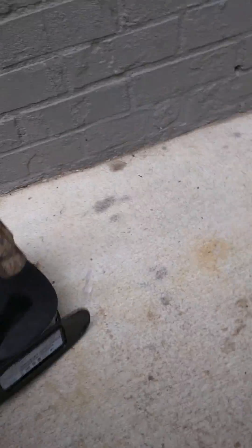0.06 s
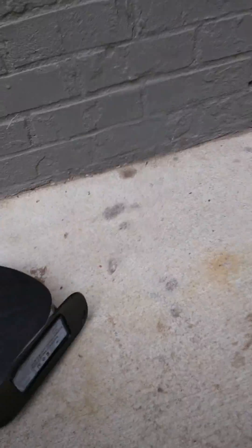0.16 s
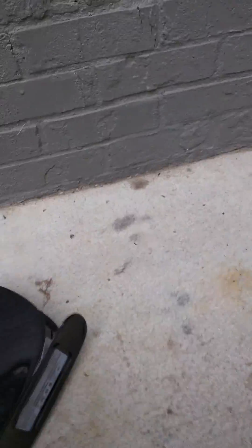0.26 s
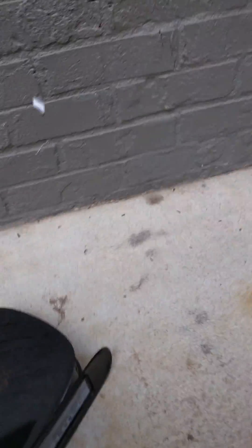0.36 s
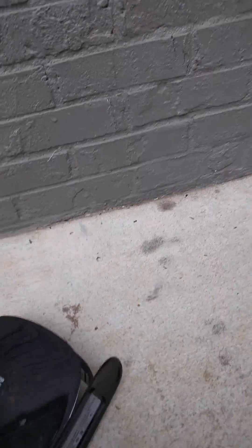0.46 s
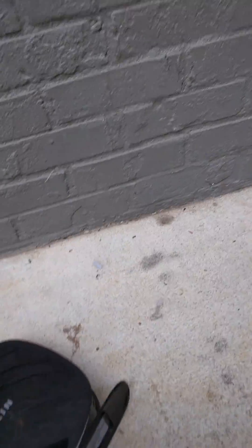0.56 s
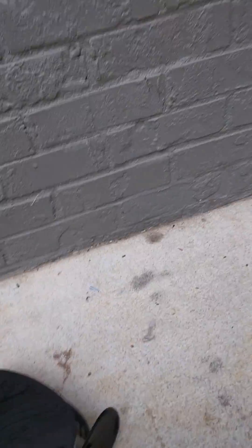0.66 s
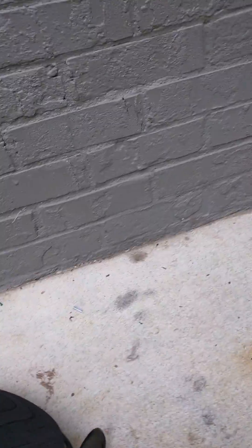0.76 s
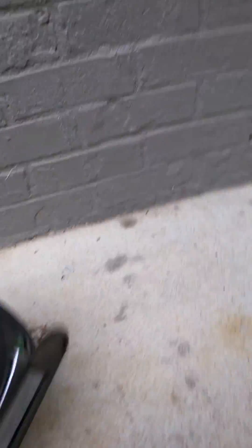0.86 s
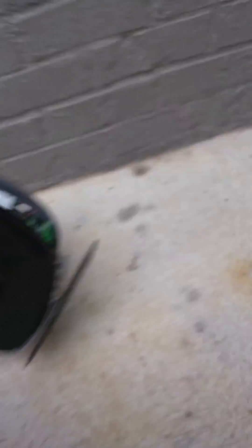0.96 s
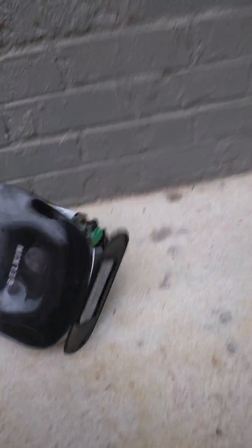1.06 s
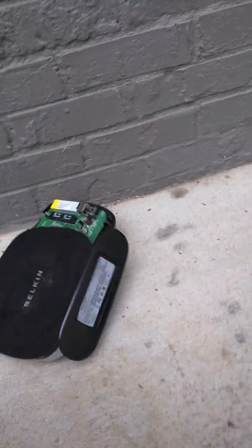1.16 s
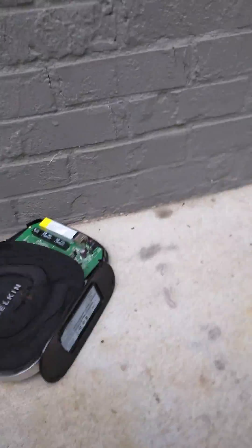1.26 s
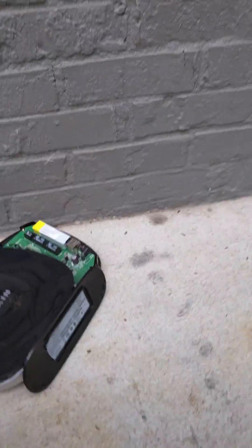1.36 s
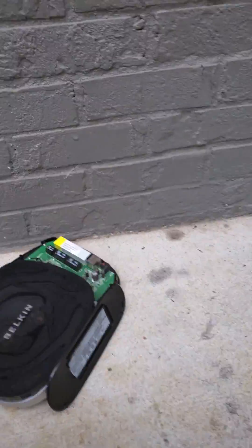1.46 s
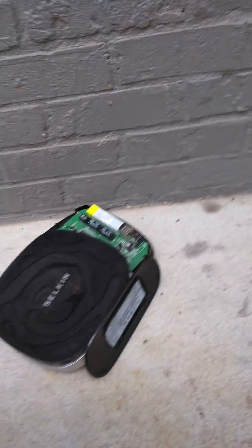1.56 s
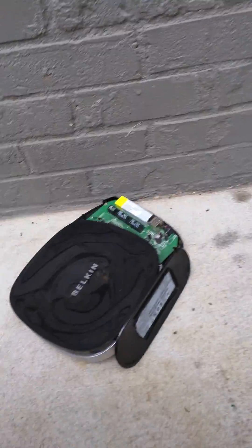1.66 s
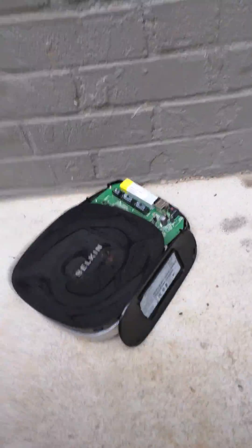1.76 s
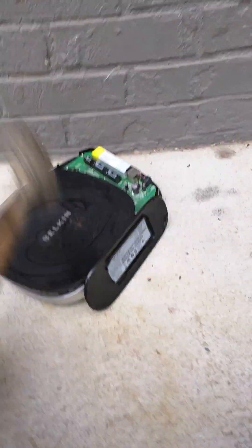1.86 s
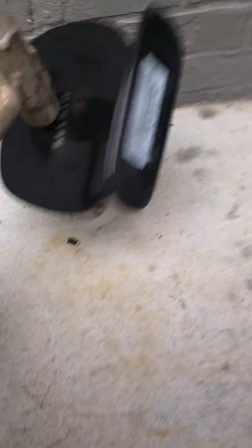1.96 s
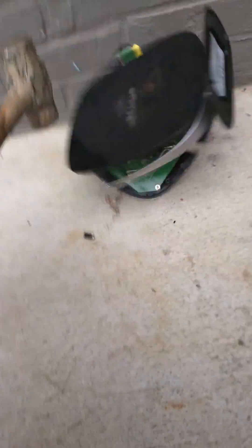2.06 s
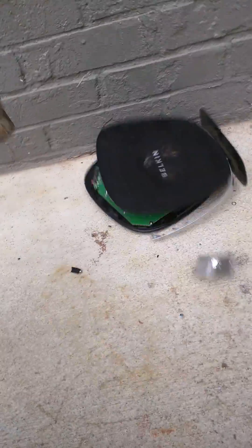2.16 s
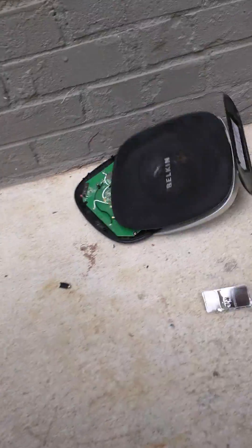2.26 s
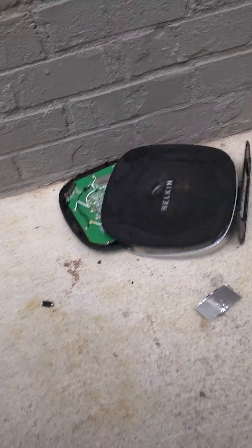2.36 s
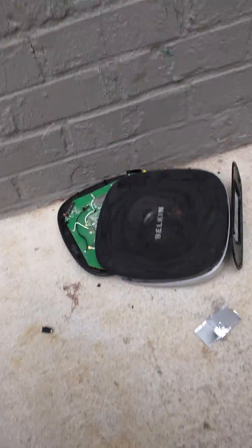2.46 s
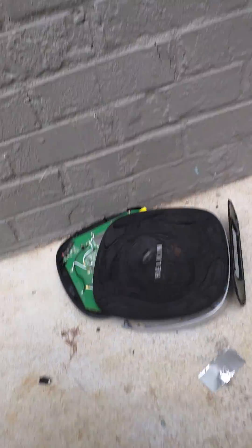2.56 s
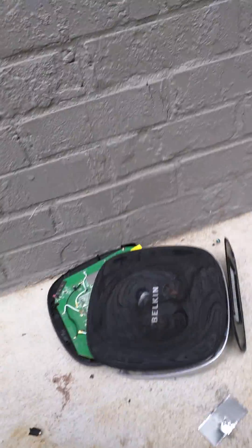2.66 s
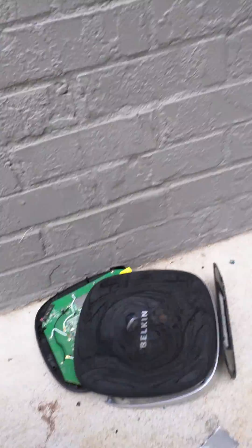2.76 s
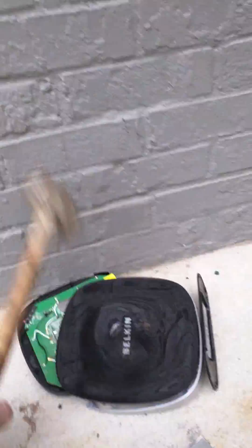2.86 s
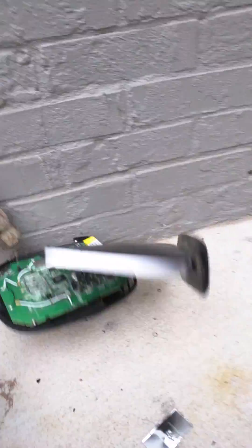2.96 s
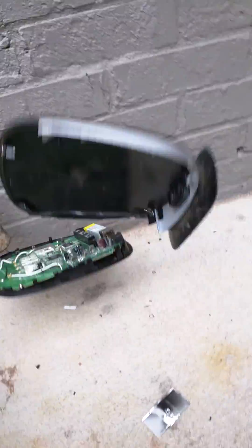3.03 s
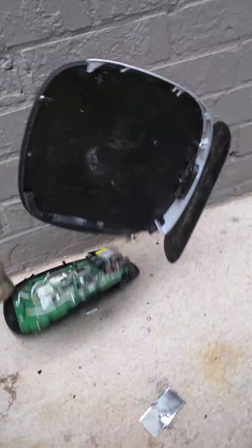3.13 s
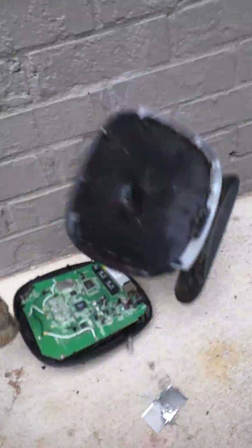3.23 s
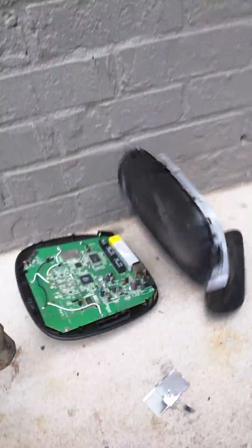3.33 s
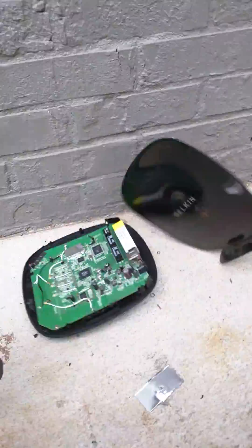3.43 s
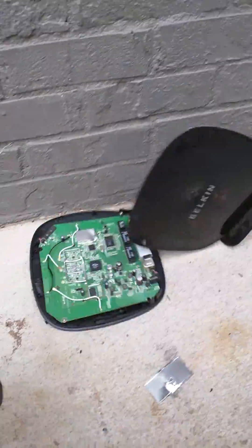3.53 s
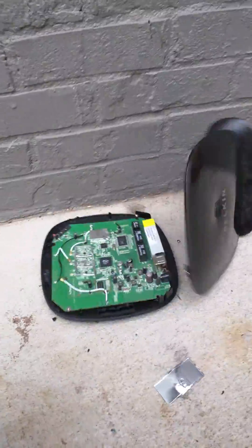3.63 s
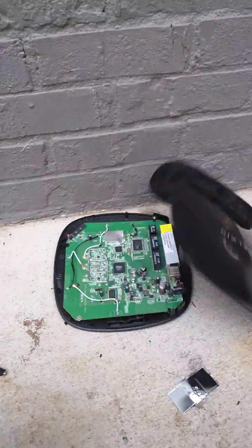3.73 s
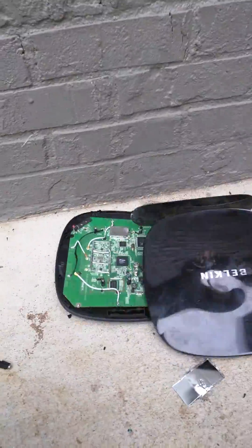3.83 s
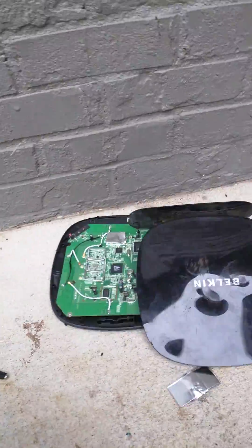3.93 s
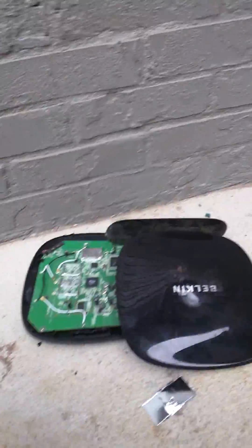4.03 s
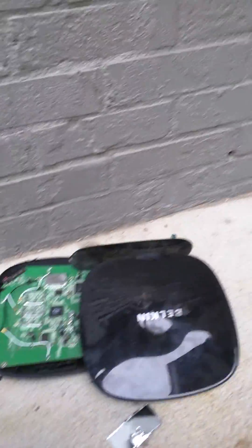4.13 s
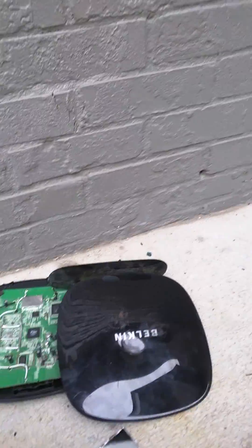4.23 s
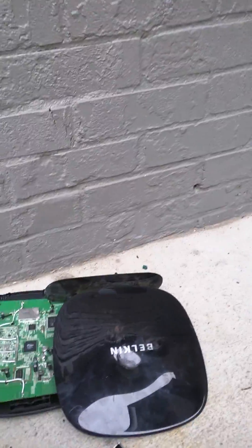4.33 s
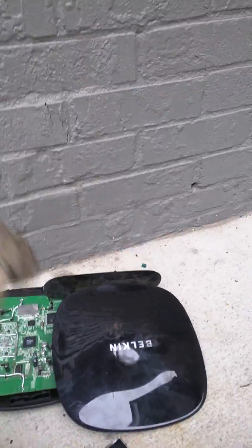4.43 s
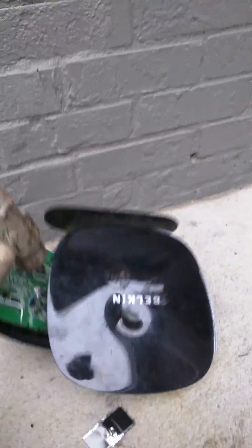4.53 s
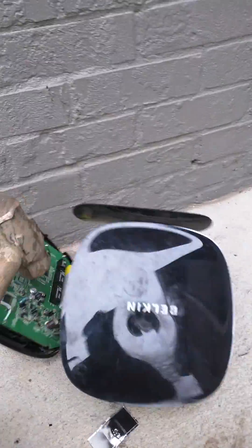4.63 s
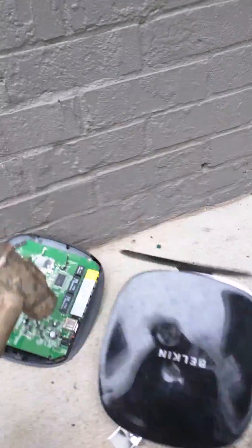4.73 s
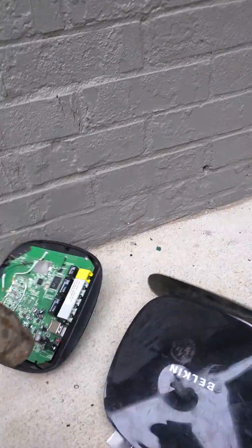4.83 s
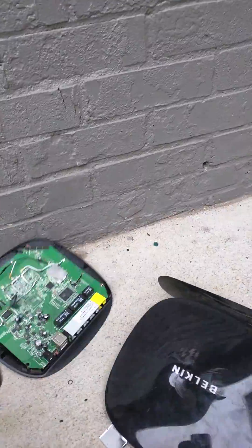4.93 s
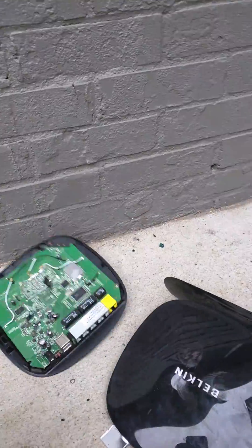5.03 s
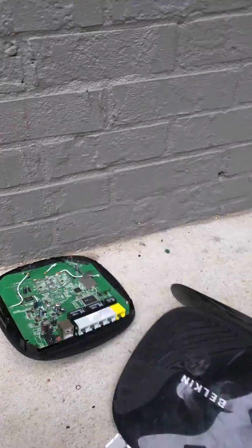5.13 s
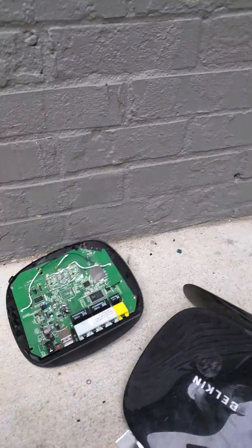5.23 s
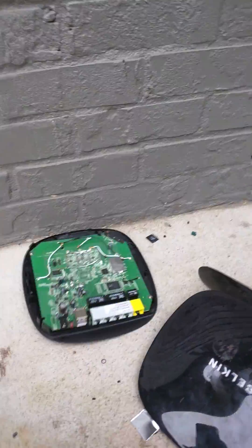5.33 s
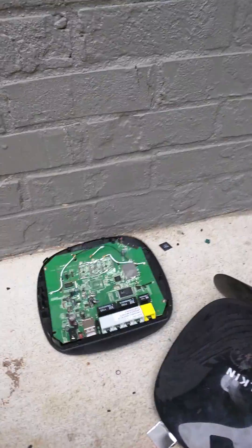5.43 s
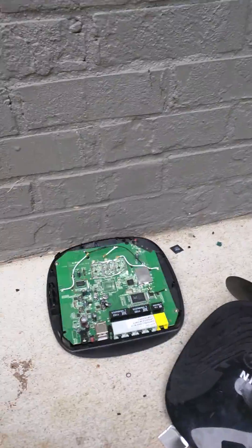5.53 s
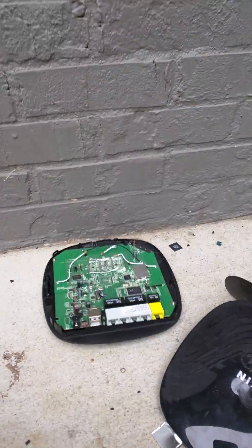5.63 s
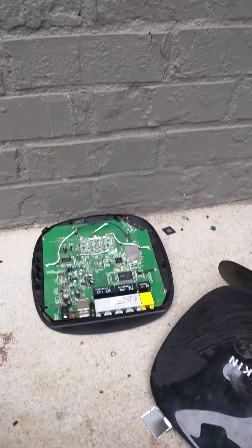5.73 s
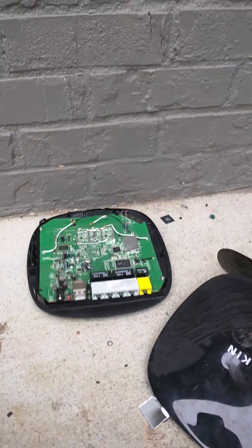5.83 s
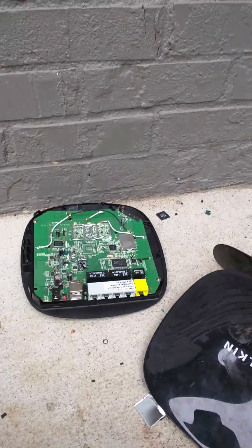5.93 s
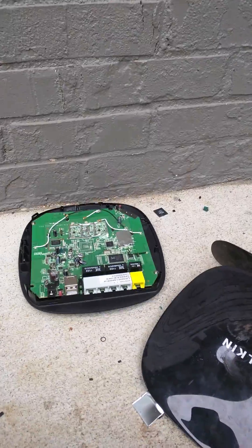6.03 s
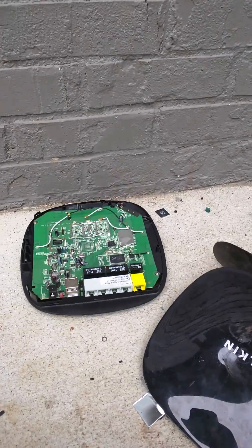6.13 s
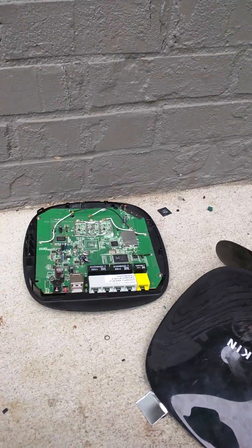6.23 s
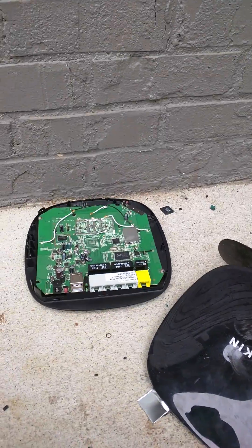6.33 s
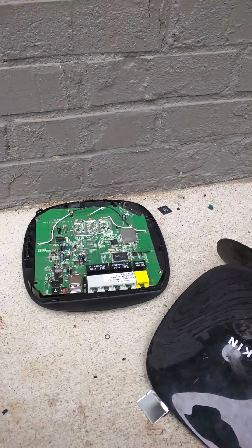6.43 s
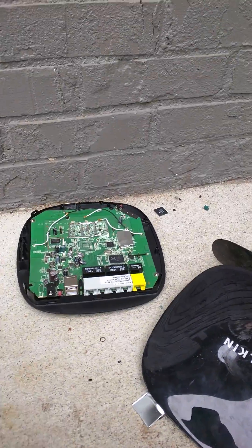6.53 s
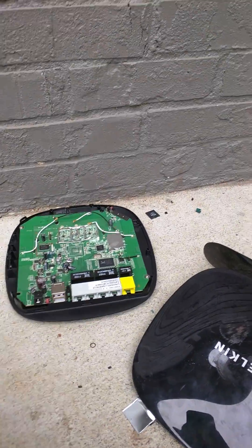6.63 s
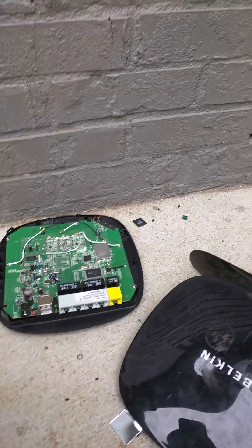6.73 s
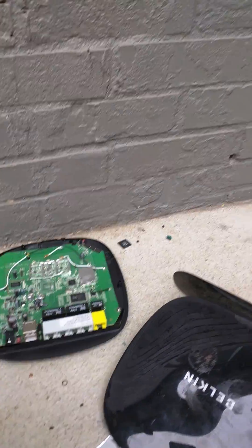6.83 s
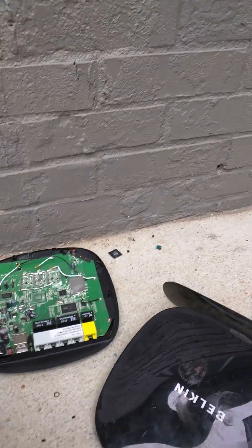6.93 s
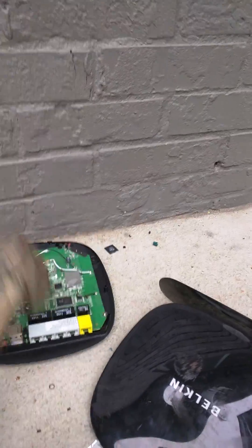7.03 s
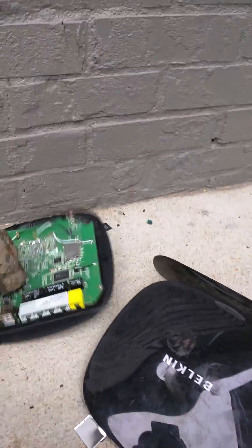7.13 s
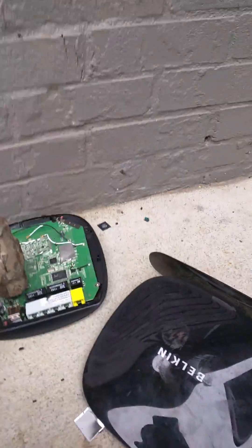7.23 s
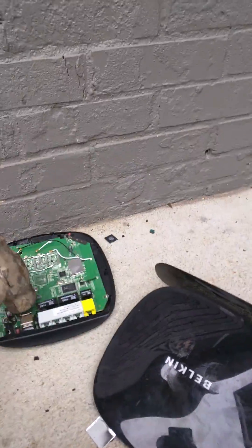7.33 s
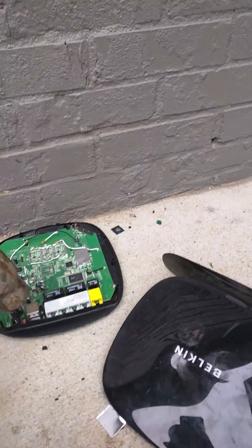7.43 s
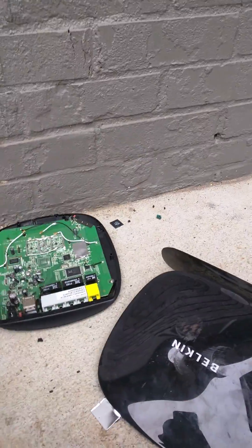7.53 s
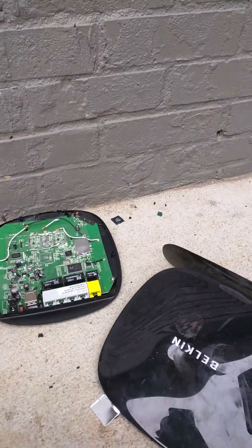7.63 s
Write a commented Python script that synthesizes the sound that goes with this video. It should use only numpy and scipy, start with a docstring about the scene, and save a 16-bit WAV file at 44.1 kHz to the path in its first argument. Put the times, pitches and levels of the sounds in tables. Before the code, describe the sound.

Close to a phone microphone outdoors, plastic pieces rattle on concrete after an earlier blow and a brief low rumble. Five hard mallet strikes follow, crunching and slightly clipped. Shell halves bounce and clack hollowly, a thin metal plate tinkles, and an open tray rocks on its rim with fading taps before a last whack. A wall and concrete give a short echo over faint hum and hiss.

```python
"""Plastic pieces still rattle from an earlier blow, over a brief low rumble; then come five mallet blows
on a plastic casing on concrete. Noise bursts make the crushing and splinters. Bursts with short tones make the
shell halves bounce and rock; uneven ticks make crumbs rattle. Fading tones make a metal plate, bracket and clip
jingle. A brick wall and the concrete echo; hum, hiss and wind lie underneath. A close phone microphone clips
the blows."""
import sys
import numpy as np
from scipy import signal
from scipy.fft import rfft, irfft, next_fast_len
from scipy.io import wavfile
from scipy.ndimage import uniform_filter1d, map_coordinates

SR = 44100
rng = np.random.default_rng(int(sys.argv[2]) if len(sys.argv) > 2 else 0)


def put_to_file(sound):
    """Save the sound as 16-bit audio at rate SR, in the file named by the first command-line argument."""
    columns = np.atleast_2d(sound).T  # one column per channel
    safe = np.clip(columns, -1, 1)
    whole_steps = np.round(safe * 32767)
    wavfile.write(sys.argv[1], SR, whole_steps.astype(np.int16))


N = 338774  # length in samples

# All levels in decibels are relative: each function sets its own balance on top of them.
# mallet blows: start_s, level_db, thump_db, crushing_s
MALLET_BLOWS = [(0.952, 0.5, -32, 0.021), (2.032, -0.5, -19, 0.017), (3.042, 1, -24, 0.014),
                (4.614, 3, -14, 0.0057), (7.192, -0.5, -16, 0.013)]
# colour of the crushing noise: pitch_hz, level_db
CRUSH_COLOUR = [(35, -11.5), (60, 3.5), (566, -1), (1200, 3), (1660, 0.5), (1860, 4.5), (2470, -2.5),
                (11800, -1), (16000, -1.5)]
# colour of plastic crunching on concrete: pitch_hz, level_db
CRUNCH_COLOUR = [(59, -54.5), (100, -23), (197, -11.5), (502, -10.5), (801, -6), (1030, -3.5), (1360, -2.5),
                 (1610, 1.5), (2420, -0.5), (14700, 2.5), (16000, -4.5)]


def blows():
    """Each blow crushes the plastic for a moment and pushes the air once; then splinters die away."""
    crush, splinters, push = np.zeros((3, N))
    t = np.arange(SR // 2) / SR
    for start_s, level_db, thump_db, crushing_s in MALLET_BLOWS:
        after = np.maximum(t - crushing_s, 0)
        rise = amp(level_db) * (1 - np.exp(-t / 0.0022))
        add(crush, start_s, rise * amp(-6.0 - 60 * after / 0.06))
        add(splinters, start_s, rise * amp(-16.5 - 60 * after / 0.45))
        air_pulse = np.exp(-((t - 0.012) / 0.0082) ** 2)
        ripple = 1 + 0.43 * np.sin(2 * np.pi * 85 * t)
        add(push, start_s, amp(thump_db) * air_pulse * ripple)
    return crush * noise(CRUSH_COLOUR) + splinters * noise(CRUNCH_COLOUR) + push


# shell pieces touching down: start_s, level_db, hollow_db (knock), treble_db (splinters),
# pitch_hz (panel), fade_s (basic time to fall by 60 dB)
SHELL_CONTACTS = [(0.087, -6, -16, -11.5, 1190, 0.39), (0.132, 5.5, -11, -13.5, 610, 0.099),
                  (0.169, -6, -15, -8, 773, 0.39), (0.354, 8.5, -15, -19, 833, 0.069),
                  (0.405, -11, -7, -16, 830, 0.059), (0.444, -5.5, -25, -2.5, 820, 0.13),
                  (0.488, -12.5, -20, 3, 1320, 0.044), (.535, -13, -23, -2, 1410, 0.054),
                  (0.558, -12, -9, -14, 1366, 0.44), (0.602, -3.5, 1, -22, 675, 0.11),
                  (0.632, -4.5, -1.5, -7.5, 775, 0.15), (0.72, -13.5, -35, -14, 1398, 0.09),
                  (0.865, -26, -6, -12.5, 515, 0.53), (1.061, -8, -9, -18, 1384, 0.14),
                  (1.161, 3.5, -5.5, -18, 1164, 0.13), (1.178, -17, -20, 6, 810, 0.039),
                  (1.239, 5, -15, -11.5, 790, 0.068), (1.262, -0.5, -17, -14, 1151, 0.25),
                  (1.306, -6, -11, -10, 1110, 0.18), (1.325, -3, -24, -4, 1360, 0.076),
                  (1.379, 5, -29, -13, 1356, 0.098), (1.454, -6, -20, -7.5, 1374, 0.31),
                  (1.498, -1, -17, -7, 1265, 0.078), (1.517, -8.5, -19, -7, 626, 0.15),
                  (1.599, -11.5, -31, -21, 1950, 0.12), (1.66, -21.5, -21, -4.5, 1624, 0.23),
                  (1.699, -21, -36, -15, 1555, 0.084), (1.784, -27, -10, -6, 1690, 0.078),
                  (1.899, -36, -20, -9, 930, .05), (1.948, -36, -25, -12, 1150, 0.065),
                  (2.169, -7.5, -4.5, -15, 604, 0.15), (2.211, -8, 4, -5.5, 780, 0.087),
                  (2.245, 2.5, -16, -18, 1223, 0.07), (2.264, -18, -31, 8.5, 2040, 0.069),
                  (2.282, 2.5, -14, -11.5, 1410, 0.15), (2.311, -3, -10.5, -8.5, 1490, 0.25),
                  (2.375, -7, -28, -28, 1484, 0.077), (2.418, -9, -6.5, 1.5, 1570, 0.042),
                  (2.432, -1.5, -35, -17, 1330, 0.11), (2.464, -16, -25, -8, 1366, 0.16),
                  (2.489, -2, -13.5, -13, 1377, 0.18), (2.538, -7.5, -10, -24, 1640, 0.094),
                  (2.616, -6, -40, -25, 1400, 0.11), (2.65, -9, -32, -13, 1415, 0.12),
                  (2.718, -16.5, -33, -24, 1480, 0.072), (2.784, -25, -30, -22, 1550, 0.067),
                  (2.823, -28, -28, -20, 1404, 0.14), (2.856, -27, -21, -20, 2100, 0.089),
                  (2.915, -27.5, -14, -24, 1320, 0.28), (3.24, -7, -17, -19, 1210, 0.034),
                  (3.261, -12, 5, -18, 850, 0.08), (3.351, 0, -9, -5, 870, 0.091),
                  (3.363, 2, -27, -11, 1603, 0.084), (3.427, -12, -26, -10, 1620, 0.37),
                  (3.443, -4, -10, -11, 620, 0.32), (3.505, 0, -7, -7.5, 1460, 0.063),
                  (3.526, -5.5, -3, -7.5, 827, 0.12), (3.579, -12.5, -9, -11, 569, 0.32),
                  (3.655, -6, -14.5, -22, 604, 0.079), (3.66, -6.5, -21, -22, 1380, 0.043),
                  (3.688, -3.5, -7.5, -15, 3060, 0.06), (3.729, -16, -30, -20, 3100, 0.027),
                  (3.759, -6.5, -15, -12, 1150, 0.07), (3.797, -1, -16, -17, 2280, 0.064),
                  (3.839, -12, -25, -22, 2250, .04), (3.864, -13.5, -20, -17, 1160, .04),
                  (3.91, -10.5, 0.5, -8, 870, 0.061), (3.919, -8, -32, -9, 535, 0.15),
                  (3.951, -8, -8, -11, 754, 0.24), (4.029, -18.5, -6, -7, 570, 0.18),
                  (4.139, -9.5, -13, -16, 810, 0.13), (4.186, -16, -18, -8, 1395, 0.089),
                  (4.254, -18, -6, -31, 874, 0.064), (4.265, -23, -23, -23, 1290, 0.085),
                  (4.297, -21.5, -20, -9, 1440, 0.091), (4.332, -21, -20, -22, 953, 0.13),
                  (4.872, 1, -11, -14, 844, 0.07), (4.881, 1.5, -7, -10.5, 805, 0.13),
                  (4.944, 5, -14.5, -14, 932, 0.11), (4.962, -5, -18, -10, 867, .07),
                  (5.045, 0, -13, -10, 1367, 0.2), (5.117, -6, -19, -37, 650, 0.089),
                  (7.288, -8, -17, -8.5, 2140, 0.28), (7.298, -1.5, -25, -16, 1766, 0.083),
                  (7.377, -5, -11, -8.5, 1590, 0.068), (7.437, -9, -14, -13, 1290, 0.077),
                  (7.487, -12, -7.5, -9, 1650, 0.23), (7.6, -32.5, -29, 10, 480, 0.036),
                  (7.629, -21, -55, 9.5, 3450, 0.042), (7.642, -18, -30, -22, 2100, 0.051)]
# the open tray rocking on its rim, tap after tap: start_s, level_db, pitch_hz (panel), fade_s
ROCKING_TAPS = [(5.21, 0, 1340, 0.093), (5.237, 1.5, 1360, 0.1), (5.326, -10, 1430, 0.17),
                (5.342, -1, 1165, 0.03), (5.364, 0.5, 2290, 0.071), (5.447, -5.5, 1352, 0.098),
                (5.478, -5, 1340, 0.067), (5.561, -10.5, 1654, 0.23), (5.579, -12, 2120, 0.17),
                (5.736, -20, 1630, 0.17), (5.754, -15, 1340, 0.11), (5.781, -19.5, 1333, 0.25),
                (5.817, -17, 1170, 0.37), (5.974, -16, 1654, 0.12), (5.987, -14, 1580, 0.1),
                (6.043, -13, 1560, 0.1), (6.049, -19, 1460, 0.15), (6.147, -15.5, 1150, 0.037),
                (6.162, -15, 1880, 0.25), (6.294, -20.5, 1930, 0.35), (6.331, -13.5, 1625, 0.24),
                (6.403, -16, 1520, 0.13), (6.444, -18, 1685, 0.14), (6.522, -25.5, 1150, 0.23),
                (6.654, -19, 1550, 0.13), (6.868, -31, 1270, 0.27), (7.015, -30, 2170, 0.051),
                (7.11, -32, 1163, 0.53)]
TRAY_HOLLOW_DB, TRAY_TREBLE_DB, SPLINTER_PER_DB = -17, -7.5, 0.33  # harder taps splinter more
NEIGHBOUR_DB, NEIGHBOUR_SPREAD = -5, 1.3  # a second panel rings along, at most this pitch ratio away
PANEL_DB, STIFF_HZ = -15.5, 1700  # panel ring level; stiffer panels above this pitch ring less


def contacts():
    """Each contact is a burst of crackle and a short, unsteady ring of the panel that touches down."""
    body, hollow, treble, panel = np.zeros((4, N))
    t = np.arange(SR // 3) / SR
    turn = 0.9 * wobble(80)  # uneven phase, in radians
    damping_db = 3 * wobble(60)  # the ground grips and frees the panel
    rocking = [(start_s, level_db, TRAY_HOLLOW_DB, TRAY_TREBLE_DB + SPLINTER_PER_DB * level_db, pitch_hz, fade_s)
               for start_s, level_db, pitch_hz, fade_s in ROCKING_TAPS]
    touches = SHELL_CONTACTS + rocking
    ratios = NEIGHBOUR_SPREAD ** rng.uniform(-1, 1, len(touches))

    def fall_db(seconds):
        return -60 * (t / seconds) ** 0.99

    for (start_s, level_db, hollow_db, treble_db, pitch_hz, fade_s), ratio in zip(touches, ratios):
        fade_s = np.clip(fade_s, 0.01, 0.5)
        first_crack = 1 + 0.5 * np.exp(-t / 0.003)  # the first touch cracks loudest
        rise = amp(level_db) * (1 - np.exp(-t / 0.00091)) * first_crack
        add(body, start_s, rise * amp(-20.0 + fall_db(fade_s)))
        add(hollow, start_s, rise * amp(hollow_db - 11.0 + fall_db(1.085 * fade_s)))  # low part lasts longer
        add(treble, start_s, rise * amp(treble_db - 5.5 + fall_db(0.95 * fade_s)))

        here = np.minimum(round(start_s * SR) + np.arange(len(t)), N - 1)
        ring = np.sin(2 * np.pi * pitch_hz * t + turn[here])
        neighbour = np.sin(2 * np.pi * pitch_hz * ratio * t - turn[here])
        ring = ring + amp(NEIGHBOUR_DB) * neighbour
        ring_gain = amp(PANEL_DB + fall_db(0.76 * fade_s) + damping_db[here])
        add(panel, start_s, rise * ring_gain * ring * min(1, STIFF_HZ / pitch_hz))

    body_noise, hollow_noise, treble_noise = crackle(shell_db=10, tray_db=10)
    return body * body_noise + hollow * hollow_noise + treble * treble_noise + panel


# resonances of the closed shell: pitch_hz, width_hz, level_db
SHELL_MODES = [(297, 590, -7), (619, 60, -7), (830, 110, -8), (1143, 81, -6), (1333, 120, -5.5),
               (1470, 40, -11), (1980, 40, -6), (3410, 440, -15), (4000, 110, -20)]
# resonances of the tray with its circuit board: pitch_hz, width_hz, level_db
TRAY_MODES = [(588, 78, 3), (676, 36, 4), (1132, 97, 1.5), (1340, 93, 1), (1665, 65, -1.5), (2015, 70, 0.5),
              (3280, 480, -14)]
LID_OFF_S = 5.2  # from here on the open tray colours the crackle


def crackle(shell_db, tray_db):
    """Dense uneven ticks of plastic on concrete, split into body, hollow and treble parts of equal power."""
    ticks = pieces(patch_db=3) * amp(1.2 * wobble(900) + 1.2 * wobble(150))

    def through(modes, ring_db):
        return unit(filtered(ticks, lambda f: amp(along(CRUNCH_COLOUR, f)) * ringing(modes, f, ring_db)))

    def below(f, hz):
        return 1 / (1 + (f / hz) ** 6)

    shell = through(SHELL_MODES, shell_db)
    tray = through(TRAY_MODES, tray_db)
    whole = np.where(np.arange(N) < LID_OFF_S * SR, shell, tray)
    hollow = filtered(whole, lambda f: below(f, 960))
    treble = filtered(whole, lambda f: 1 - below(f, 3600))
    return unit(whole - hollow - treble), unit(hollow), unit(treble)


def pieces(patch_db):
    """White noise in which bands swell and fade, as small pieces of many sizes ring for a moment each."""
    hz, _, z = signal.stft(rng.standard_normal(N), SR, nperseg=512)
    across_pitch = uniform_filter1d(rng.standard_normal(z.shape), 2, 0)
    patches = unit(uniform_filter1d(across_pitch, 5, 1))
    small = np.clip(hz / 3000, 0.3, 1)[:, None]  # crumbs ring high; the low range belongs to the shell
    return signal.istft(z * amp(patch_db * small * patches), nperseg=512)[1][:N]


def ringing(modes, f, ring_db):
    """Resonances over a direct path; between neighbours they cancel."""
    total = sum(amp(level_db) * 1j * f * width_hz / (pitch_hz * pitch_hz - f * f + 1j * f * width_hz)
                for pitch_hz, width_hz, level_db in modes)
    return 1 + amp(ring_db) * total


# shell halves landing flat: start_s, level_db, pitch_hz
FLAT_LANDINGS = [(0.604, -11, 290), (0.635, -9, 245), (3.229, -18, 464), (3.442, -16.5, 350),
                 (3.506, -14.5, 350), (3.949, -17.5, 280), (4.027, -21, 310), (4.871, -10.5, 327)]


def landings():
    """The air under a flat-landing shell half booms: one short low tone each."""
    out, t = np.zeros(N), np.arange(SR // 8) / SR
    for start_s, level_db, pitch_hz in FLAT_LANDINGS:
        envelope = amp(level_db - 60 * t / 0.067) * (1 - np.exp(-t / 0.0011))
        add(out, start_s, envelope * np.sin(2 * np.pi * pitch_hz * t))
    return out


# sliding edges that keep one panel singing: start_s, lasts_s, level_db, pitch_hz
SLIDING_EDGES = [(1.257, .12, -21, 1120), (1.393, 0.2, -33, 1400), (3.575, 0.15, -30, 592)]


def scrapes():
    """A sliding edge makes a panel sing: a rough tone with stuttering level and unsteady phase."""
    out, t = np.zeros(N), np.arange(N) / SR
    stutter, turn = amp(4 * wobble(90)), 1.6 * wobble(90)
    for start_s, lasts_s, level_db, pitch_hz in SLIDING_EDGES:
        fade_in_out = np.clip(np.minimum(t - start_s, start_s + lasts_s - t) / 0.021, 0, 1)
        out += amp(level_db) * fade_in_out * np.sin(2 * np.pi * pitch_hz * t + turn)
    return stutter * out


# taps of the thin metal plate, a small metal bracket and a small loose clip: start_s, level_db
PLATE_HITS = [(2.2667, 2.5), (2.4364, -17), (2.4867, -1), (2.5444, -5), (2.5657, -6), (2.613, -2.5),
              (2.6544, -10), (2.6694, -4.5), (4.0308, -11), (4.0584, -6), (4.093, -3), (4.138, -4.5),
              (4.1698, -8.5), (4.2086, -15.5)]
BRACKET_HITS = [(1.1894, -5), (1.5005, -3), (1.5694, -12.5), (1.62, -12.5), (1.6444, -20), (1.6824, -16),
                (5.01, -6), (5.1094, -31)]
CLIP_HITS = [(.447, -2), (.727, -10.5), (4.947, 3.5)]
# the tones each of them rings with: pitch_hz, level_db, fade_s (time to fall by 60 dB)
PLATE_MODES = [(3950, -15, .15), (4750, -8.5, .22), (5110, -17, .15), (5370, -15, .18), (7480, -5, .12),
               (8020, -11, .1), (8390, -8, .1), (9710, -2, .13), (10120, -5, .12), (10610, -10, .1),
               (11360, -8, .1), (11620, -11, .1), (12470, -7, .09), (13070, -7, .09), (13500, -8, .09),
               (14330, -6, .09), (15280, -4, .1)]
BRACKET_MODES = [(5105, -5, .15), (8900, -8, .12), (9650, -4, .14), (10390, -2, .14), (11950, -2, .12),
                 (12510, -2, .12), (14730, 0, .1)]
CLIP_MODES = [(4220, -2, .13), (4050, -4, .11), (4850, -9, .07)]


def jingle(taps, modes):
    """Every tap rings the modes at new strengths; lying loose on concrete, each mode flutters."""
    out, t = np.zeros(N), np.arange(SR // 4) / SR
    for start_s, tap_db in taps:
        draws = rng.standard_normal((len(modes), 2))
        knots = rng.standard_normal((len(modes), 2, 30))
        ring = np.zeros(len(t))
        for (pitch_hz, level_db, fade_s), (strength, detune), (swell, turn) in zip(modes, draws, knots):
            flutter = np.interp(t * 110, np.arange(30), swell)  # 110 knots a second
            phase = 1.3 * np.interp(t * 110, np.arange(30), turn)
            strength_db = level_db + 3 * strength + 3 * flutter
            tone = np.sin(2 * np.pi * pitch_hz * (1 + 0.0014 * detune) * t + phase)
            ring += amp(strength_db - 60 * t / fade_s) * tone
        add(out, start_s, amp(tap_db - 17.0) * (1 - np.exp(-t / 0.0017)) * ring)
    return out


# spells of loose pieces chattering: start_s, lasts_s, body_db, hollow_db, treble_db
CHATTER_SPELLS = [(0, 0.32, -27.5, -30.5, -27.5), (0.341, 0.18, -26.5, -28, -26.5),
                  (0.625, 0.17, -47, -41, -38.5), (0.97, 0.2, -29, -33.5, -27),
                  (1.166, 0.25, -32, -33, -22.5), (1.384, 0.16, -25, -31, -24),
                  (1.576, 0.11, -48, -48, -45), (2.047, 0.17, -24.5, -33.5, -28.5),
                  (2.251, 0.31, -24.5, -32, -24.5), (2.464, 0.25, -49, -44, -35),
                  (3.09, 0.19, -30.5, -31.5, -28.5), (3.348, 0.23, -29, -34, -28.5),
                  (3.607, 0.33, -38, -38.5, -39), (3.932, 0.094, -33, -32.5, -34),
                  (4.033, 0.27, -44, -40, -39.5), (4.679, 0.16, -30, -32, -30.5),
                  (4.883, 0.24, -32.5, -27.5, -24.5), (5.201, 0.227, -31.5, -36.5, -28.5),
                  (5.455, 0.2, -36, -39.5, -39), (5.749, 0.12, -37.5, -44, -60),
                  (5.972, 0.23, -39, -42, -48), (6.3, 0.41, -48, -48, -65), (6.656, 0.43, -57.5, -55, -67),
                  (7.217, 0.18, -28, -45.5, -26.5), (7.447, 0.023, -36, -44, -43),
                  (7.614, .08, -69, -65, -40)]
STIR_S, SAG_DB_PER_S = 0.0078, 13.5  # a spell swells quickly, then tires
# 60 dB fade once a spell is over: body_s, hollow_s, treble_s
SPELL_SETTLE_S = (0.24, 0.51, 0.29)
# the last crumbs never lie quite still: body_db, hollow_db, treble_db
RESTLESS_CRUMBS_DB = (-60, -66.5, -64.5)


def rattle():
    """Crumbs and loose parts chatter in uneven clumps; each spell swells, tires and settles."""
    power = np.zeros((3, N)) + amp(RESTLESS_CRUMBS_DB)[:, None] ** 2
    t = np.arange(SR) / SR
    for start_s, lasts_s, *levels_db in CHATTER_SPELLS:
        for track, level_db, settle_s in zip(power, levels_db, SPELL_SETTLE_S):
            fall_db = SAG_DB_PER_S * t + 60 * np.maximum(t - lasts_s, 0) / settle_s
            gain = amp(level_db - fall_db) * (1 - np.exp(-t / STIR_S))
            add(track, start_s, gain ** 2)  # overlapping spells add as power
    clumps = amp(1.3 * wobble(45))
    parts = crackle(shell_db=14, tray_db=15)
    body, hollow, treble = (np.sqrt(p) * clumps * part for p, part in zip(power, parts))
    return body + hollow + grit() * treble


GRIT_PER_S, GRIT_DB, GRIT_FADE_S = 60, 1, 0.02  # average tick rate, upper tick size, 60 dB fade


def grit():
    """Single crumbs tick out of the chatter: a gain that jumps at random moments and falls back."""
    ticks = (rng.random(N) < GRIT_PER_S / SR) * amp(GRIT_DB) * rng.random(N)
    t = np.arange(SR // 10) / SR
    return unit(1 + signal.fftconvolve(ticks, amp(-60 * t / GRIT_FADE_S))[:N])


# how long the yard's echo lasts: pitch_hz, fade_s (time to fall by 60 dB)
YARD_FADE = [(200, 0.28), (2000, 0.4), (12000, 0.13)]


def yard(x):
    """Wall and concrete answer with a tail of noise; each frequency dies at its own speed."""
    hz, t, z = signal.stft(rng.standard_normal(SR // 2), SR, nperseg=256)
    fading = z * amp(-60 * t / along(YARD_FADE, hz)[:, None])
    tail = signal.istft(fading, SR, nperseg=256)[1]
    return signal.fftconvolve(x, tail / np.linalg.norm(tail))[:N]


# colour of the far outdoor hiss: pitch_hz, level_db
HISS_COLOUR = [(25, 1), (100, -1), (190, -14),  (300, -12.5), (400, -23), (1200, -22), (2200, -43),
               (3000, -47.5), (16000, -43.5)]
# faint wavering tones over the hum: pitch_hz, level_db
DRONE_TONES = [(205, -68.5), (290, -65)]
# low rumble, mostly wind on the microphone port: time_s, level_db
RUMBLE_LEVEL = [(0, -6.5), (.13, -69), (.45, -34.5), (1.1, -44.5), (1.17, -31), (1.3, -46), (2.25, -40),
                (2.4, -46), (3.9, -51), (4.05, -27), (4.2, -54), (6.35, -58), (6.5, -39), (6.8, -47.5),
                (7, -51), (7.68, -44.5)]
# slow swings of the microphone's baseline, below hearing: centre_s, size (signed), half_length_s
BASELINE_SWINGS = [(0.112, -0.13, 0.033), (0.142, 0.2, 0.0072), (0.32, -0.14, 0.098), (1.154, 0.081, 0.069),
                   (2.214, 0.097, 0.067), (7.4, -0.07, 0.1)]


def outdoors():
    """Far hiss, a wavering machine hum, lumps of low rumble and slow swings of the microphone's baseline."""
    t = np.arange(N) / SR
    hiss = amp(-50) * noise(HISS_COLOUR)
    hum = amp(-58.0 + 1.3 * wobble(2.4)) * np.sin(2 * np.pi * 119 * t + 0.6 * wobble(6.2))
    for pitch_hz, level_db in DRONE_TONES:
        tone = np.sin(2 * np.pi * pitch_hz * t + 1.5 * wobble(12))
        hum = hum + amp(level_db + 4 * wobble(3)) * tone
    low_noise = noise([(5, -1.5), (15, 2.0), (45, -14.5), (90, -17), (300, -41.0)])  # pitch_hz, level_db
    lumps = unit(amp(4 * wobble(9)) * low_noise)
    rumble_s, rumble_db = np.transpose(RUMBLE_LEVEL)
    rumble = amp(np.interp(t, rumble_s, rumble_db)) * lumps
    swings = sum(size * np.exp(-((t - centre_s) / half_s) ** 2) for centre_s, size, half_s in BASELINE_SWINGS)
    return hiss + hum + rumble + swings


def amp(db):
    """Turn decibels into gain."""
    return 10 ** (np.asarray(db) / 20)


def unit(x):
    """Scale x to an average (rms) level of 1."""
    return x / np.sqrt(np.mean(x ** 2) + 1e-20)


def along(points, hz):
    """Read a curve of (pitch_hz, value) points on a log pitch axis."""
    f, v = np.transpose(points)
    return np.interp(np.log(hz + 1), np.log(f + 1), v)


def wobble(rate):
    """A smooth random curve with rate knots a second."""
    knots = rng.standard_normal(int(N * rate / SR) + 4)
    return map_coordinates(knots, [np.arange(N) * rate / SR])


def filtered(x, response):
    """Filter x by a gain (complex if need be) for each frequency."""
    m = next_fast_len(N + SR // 2)
    return irfft(rfft(x, m) * response(np.fft.rfftfreq(m, 1 / SR)), m)[..., :N]


def noise(spectrum):
    """Random noise shaped by a colour table, at rms 1."""
    return unit(filtered(rng.standard_normal(N), lambda hz: amp(along(spectrum, hz))))


def add(track, start_s, sound):
    """Mix a sound into the track from start_s on."""
    part = track[round(start_s * SR):][:len(sound)]
    part += sound[:len(part)]


def scene():
    """Near sources with their echo, the rattle and the outdoor floor."""
    metal = (jingle(PLATE_HITS, PLATE_MODES) + jingle(BRACKET_HITS, BRACKET_MODES)
             + jingle(CLIP_HITS, CLIP_MODES))
    near = blows() + contacts() + landings() + scrapes() + metal
    echo = amp(-12) * yard(near)
    return (near + echo + rattle() + outdoors())[None]


TOP_HZ = 15900  # middle of the 300 Hz wide slope at the band limit


def record(dry):
    """The input stage clips the blows softly towards 0.8; nothing passes above the band limit."""
    clipped = dry / (1 + np.abs(dry / 0.8) ** 4) ** 0.25
    return filtered(clipped, lambda hz: np.clip((TOP_HZ + 150 - hz) / 300, 0, 1))


dry = scene()
out = record(dry)
put_to_file(out)
```